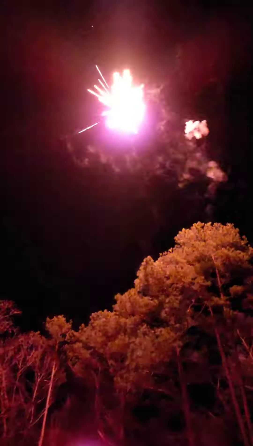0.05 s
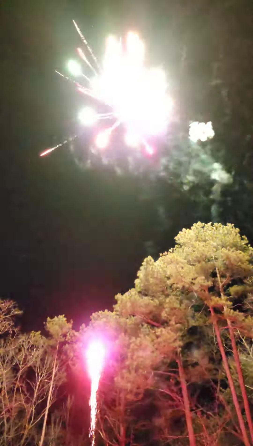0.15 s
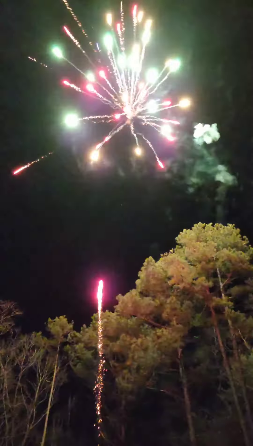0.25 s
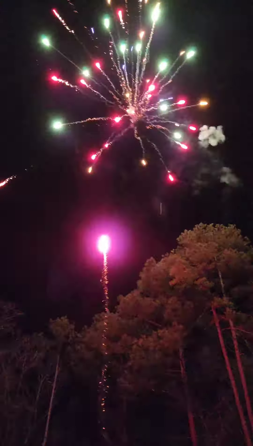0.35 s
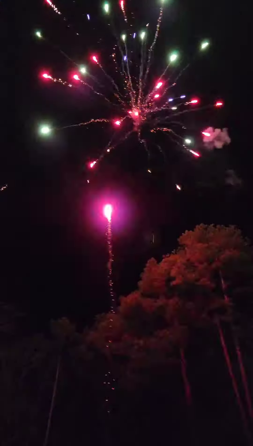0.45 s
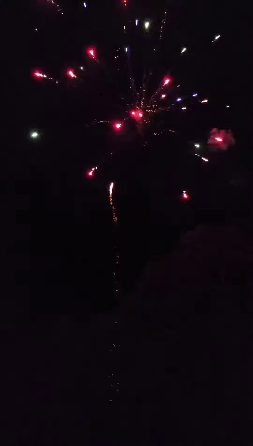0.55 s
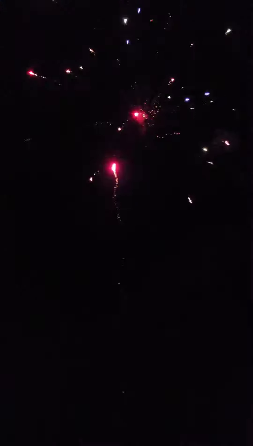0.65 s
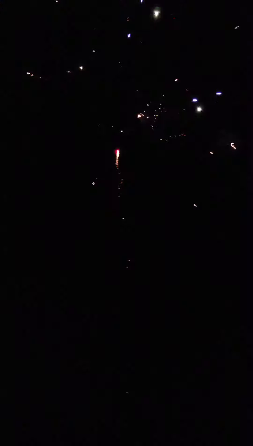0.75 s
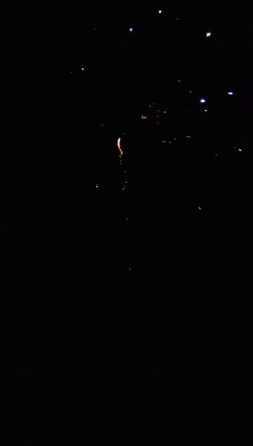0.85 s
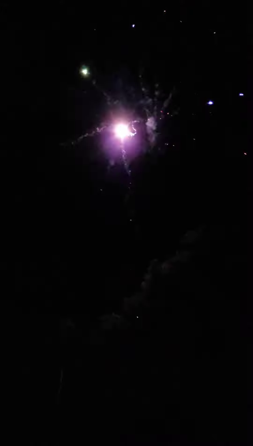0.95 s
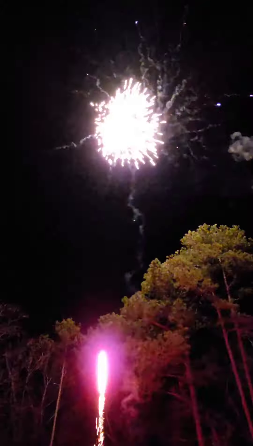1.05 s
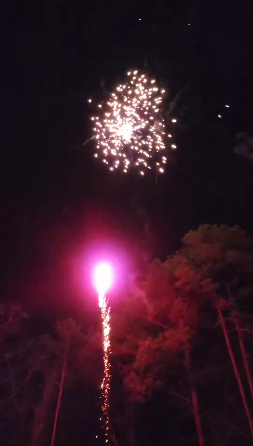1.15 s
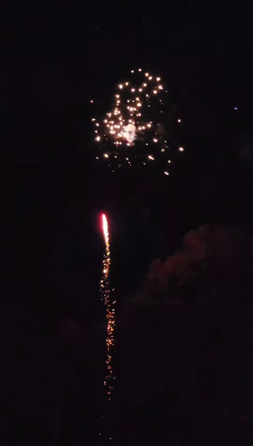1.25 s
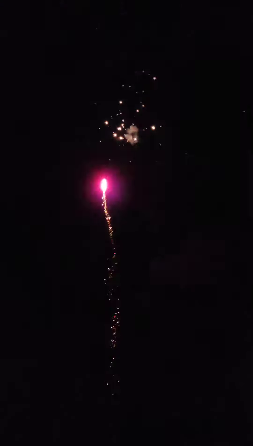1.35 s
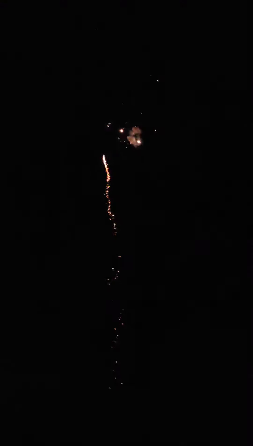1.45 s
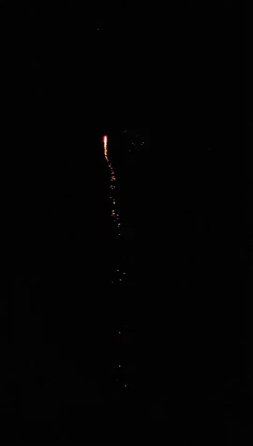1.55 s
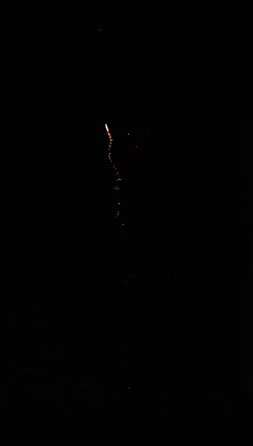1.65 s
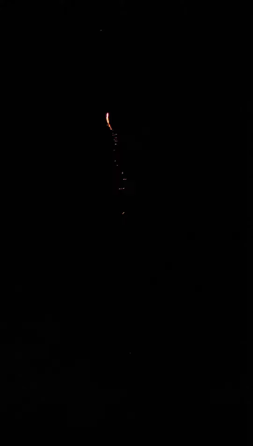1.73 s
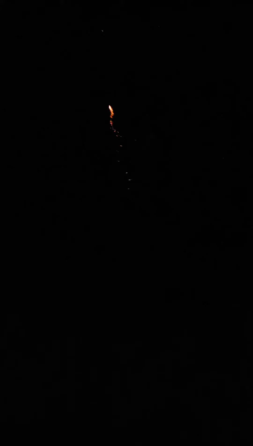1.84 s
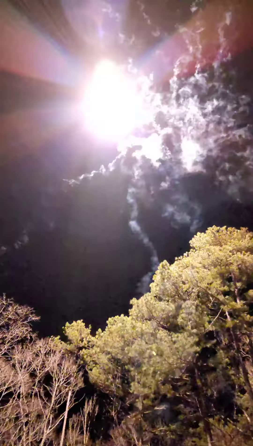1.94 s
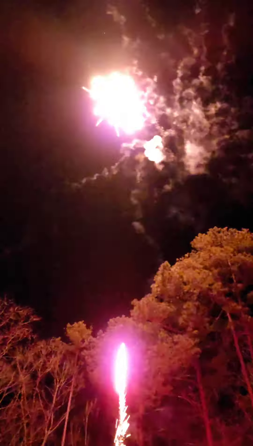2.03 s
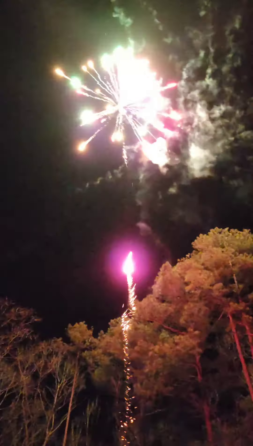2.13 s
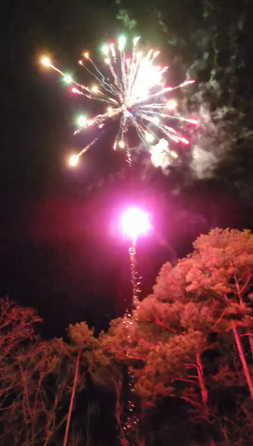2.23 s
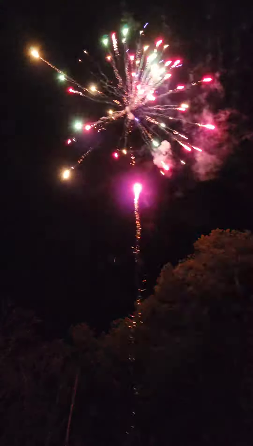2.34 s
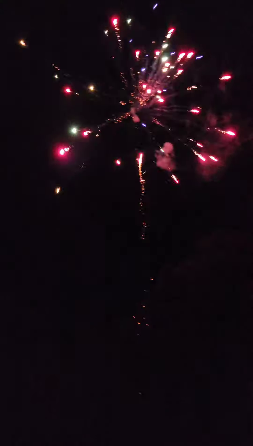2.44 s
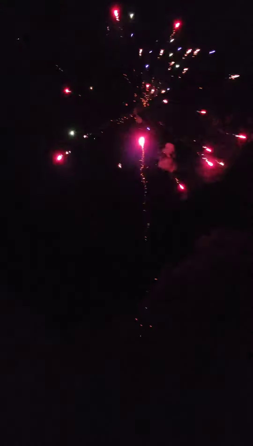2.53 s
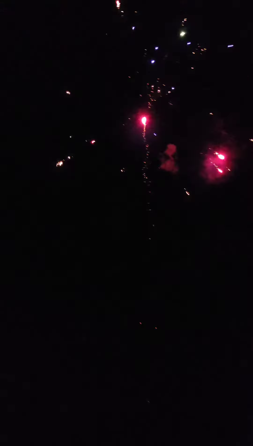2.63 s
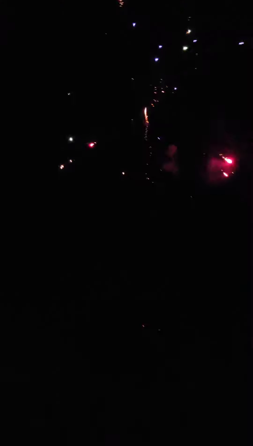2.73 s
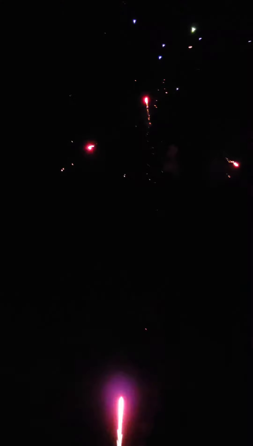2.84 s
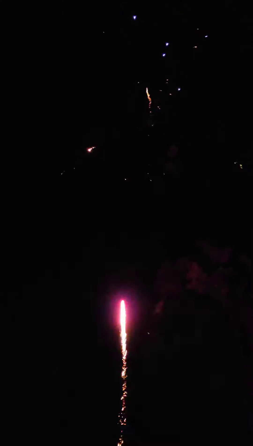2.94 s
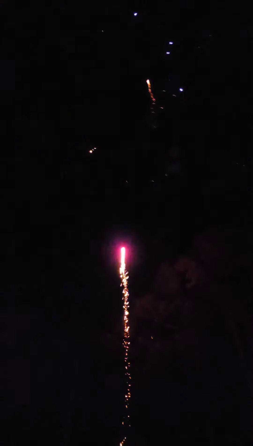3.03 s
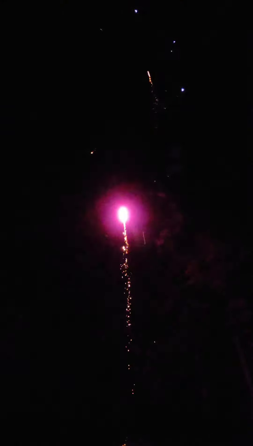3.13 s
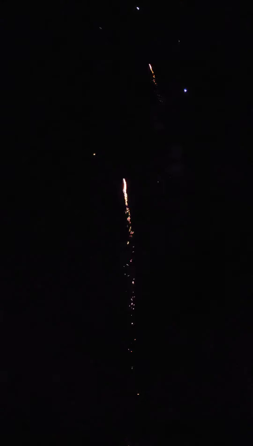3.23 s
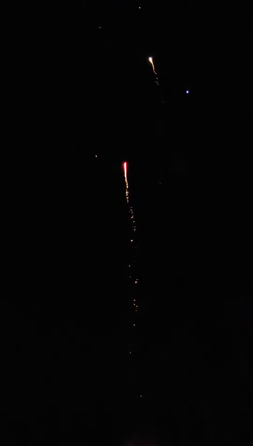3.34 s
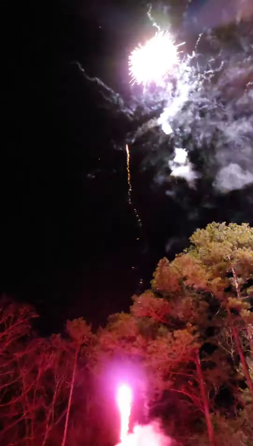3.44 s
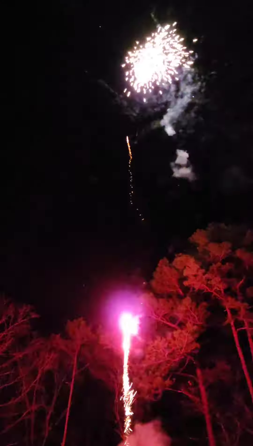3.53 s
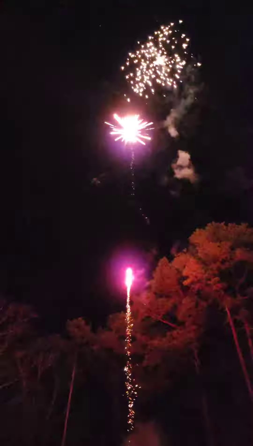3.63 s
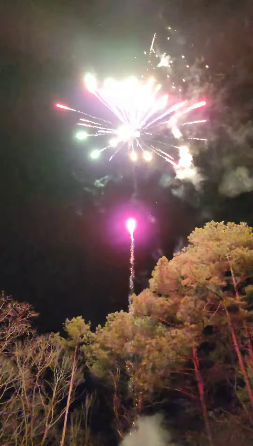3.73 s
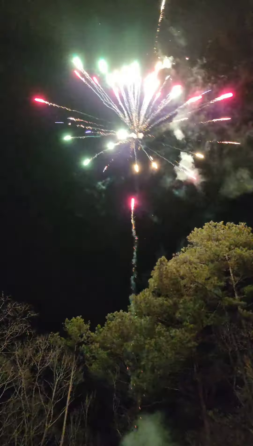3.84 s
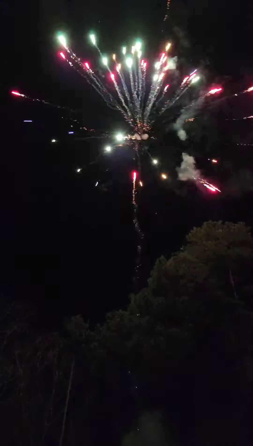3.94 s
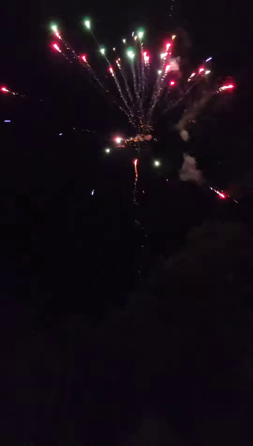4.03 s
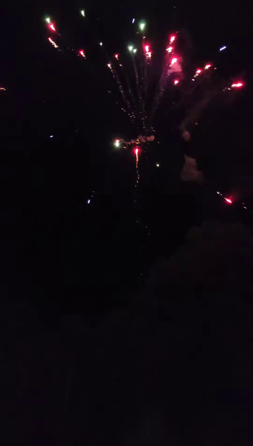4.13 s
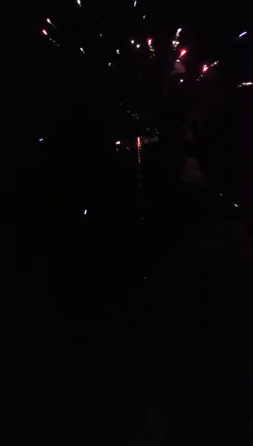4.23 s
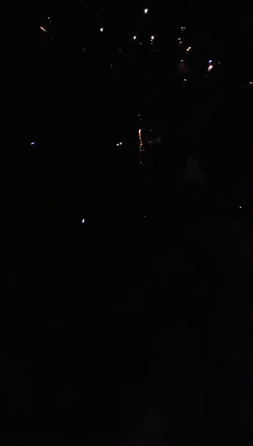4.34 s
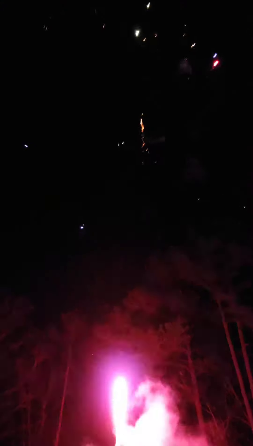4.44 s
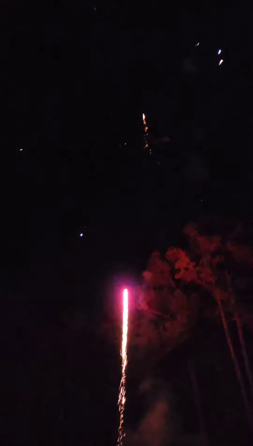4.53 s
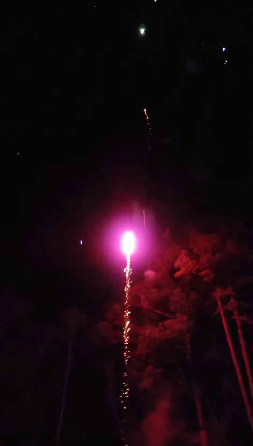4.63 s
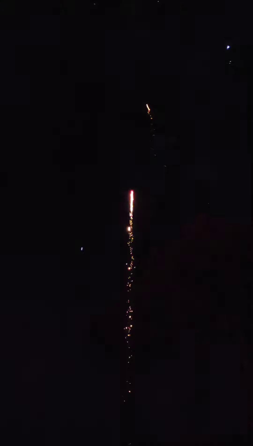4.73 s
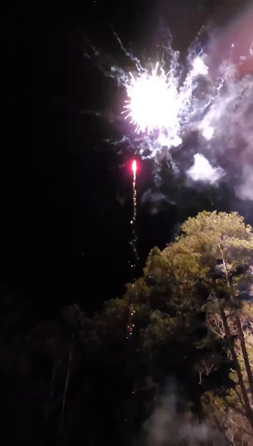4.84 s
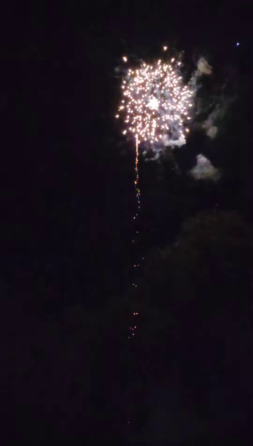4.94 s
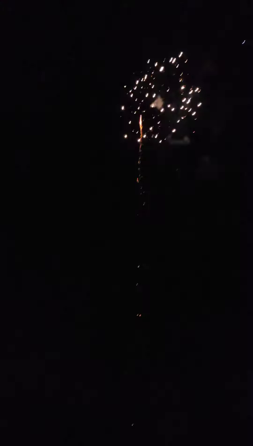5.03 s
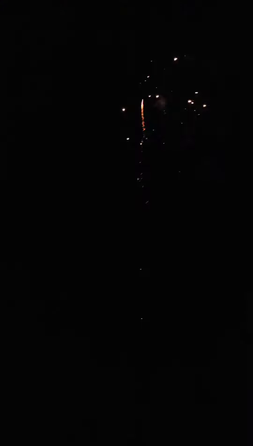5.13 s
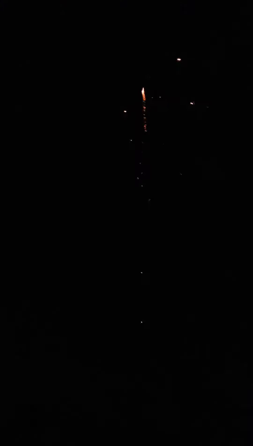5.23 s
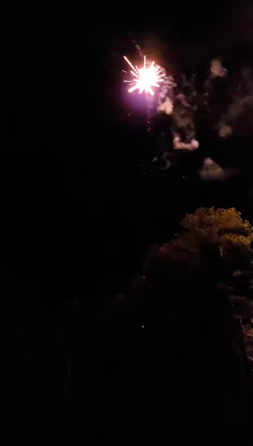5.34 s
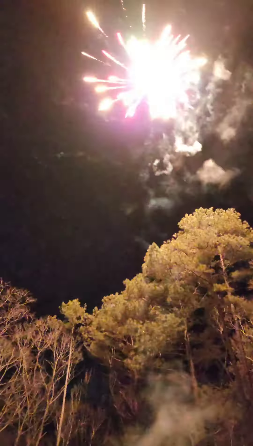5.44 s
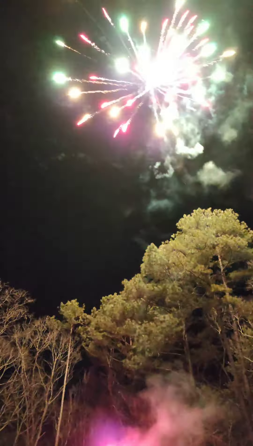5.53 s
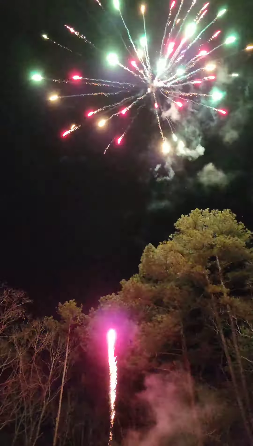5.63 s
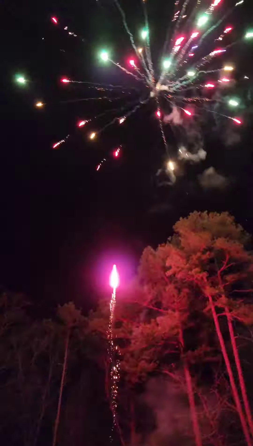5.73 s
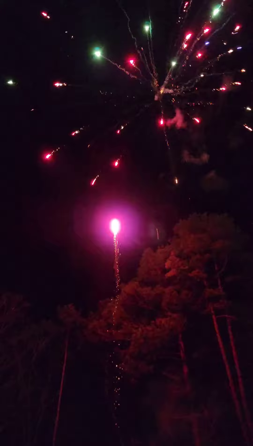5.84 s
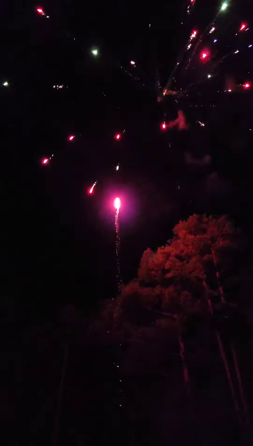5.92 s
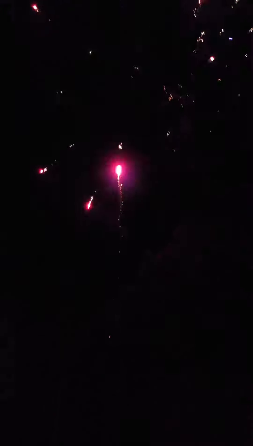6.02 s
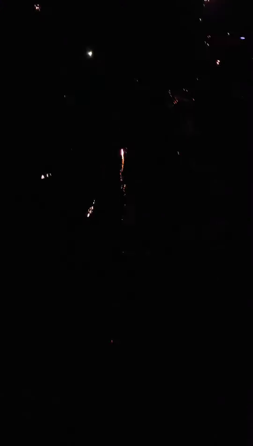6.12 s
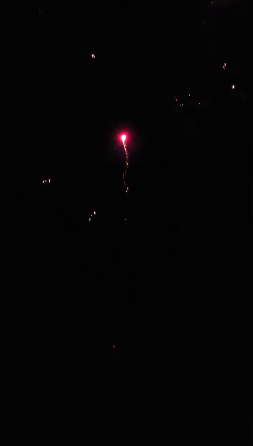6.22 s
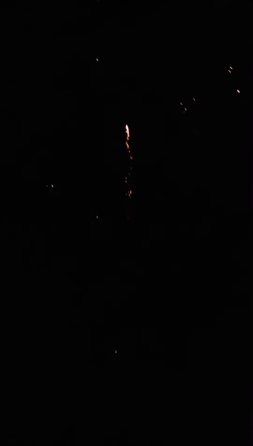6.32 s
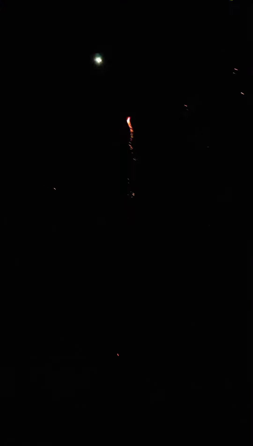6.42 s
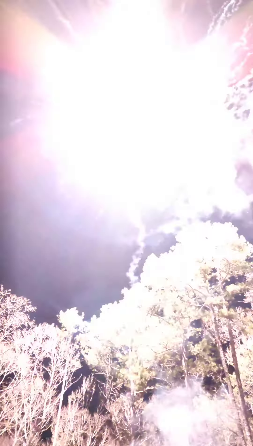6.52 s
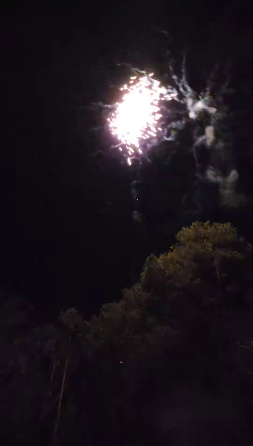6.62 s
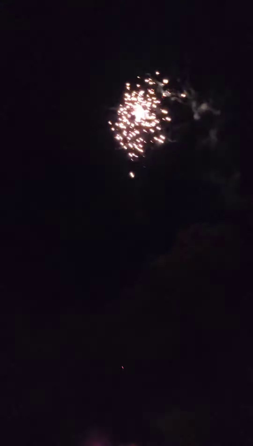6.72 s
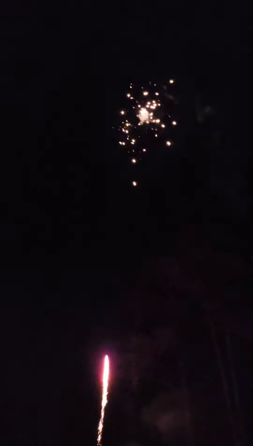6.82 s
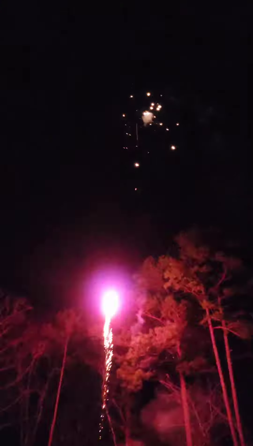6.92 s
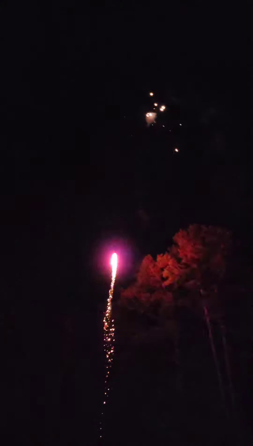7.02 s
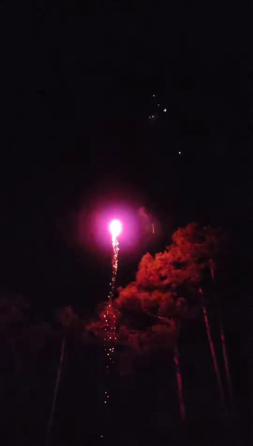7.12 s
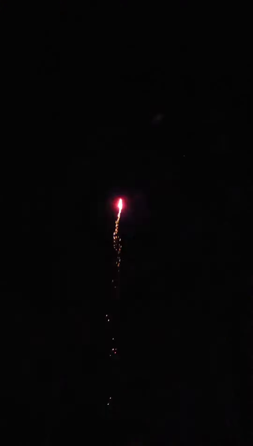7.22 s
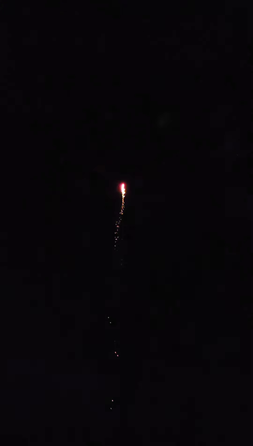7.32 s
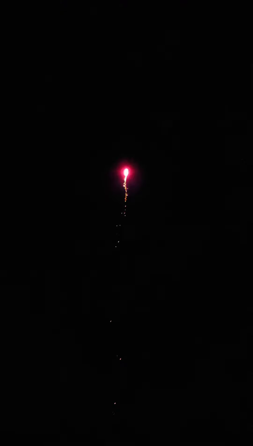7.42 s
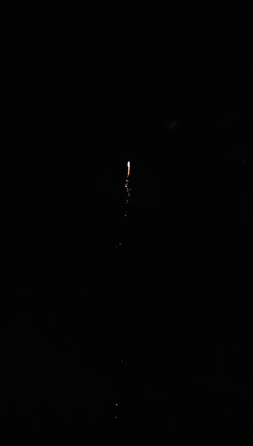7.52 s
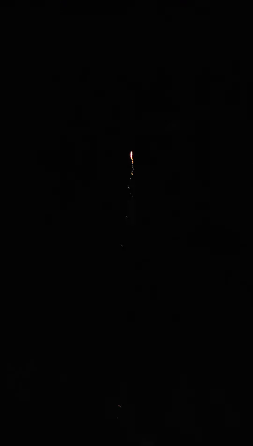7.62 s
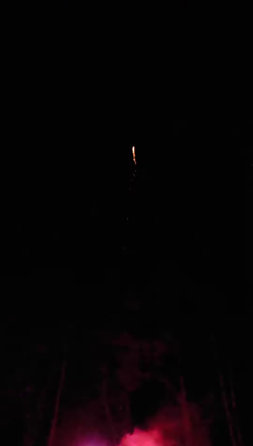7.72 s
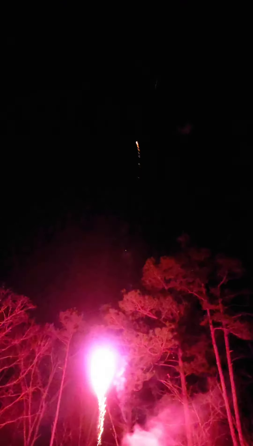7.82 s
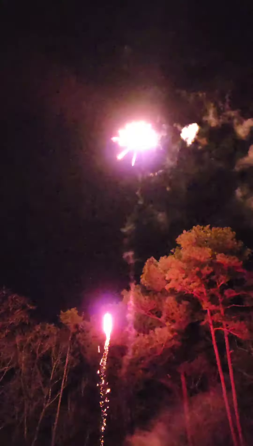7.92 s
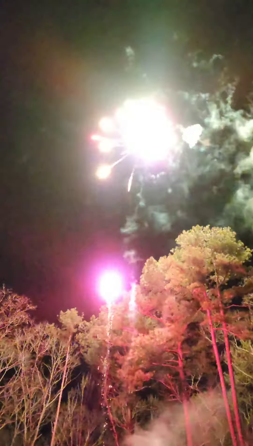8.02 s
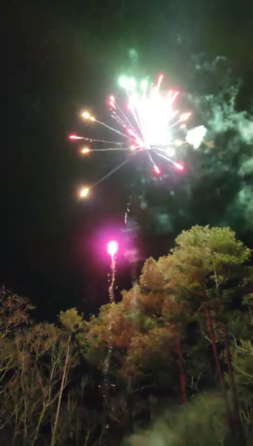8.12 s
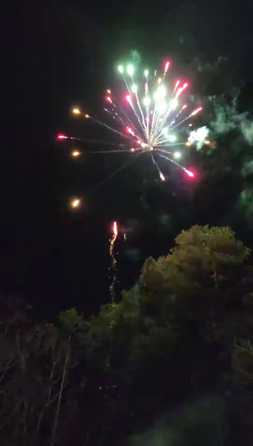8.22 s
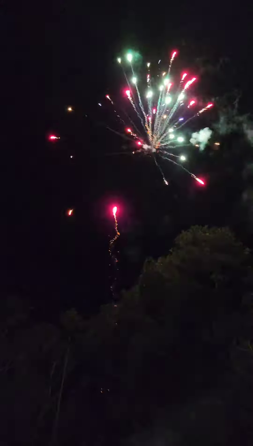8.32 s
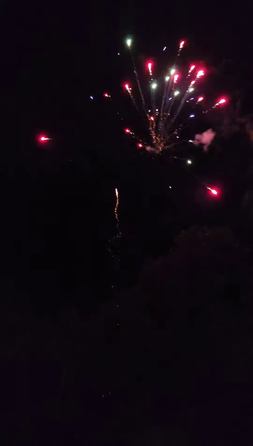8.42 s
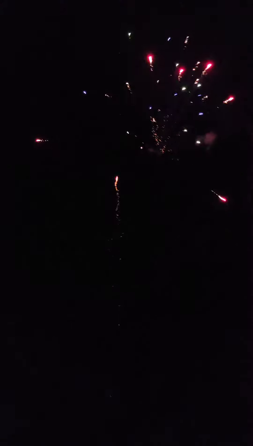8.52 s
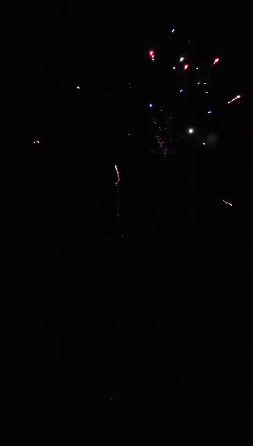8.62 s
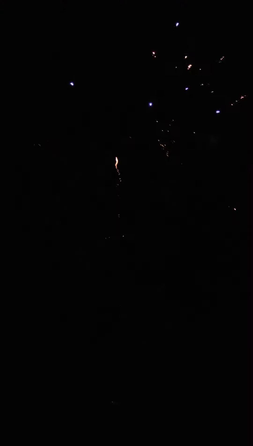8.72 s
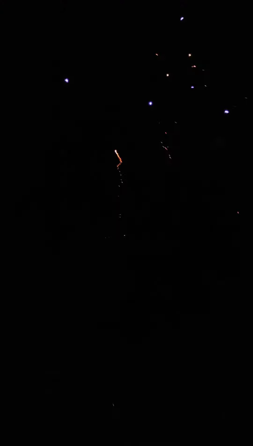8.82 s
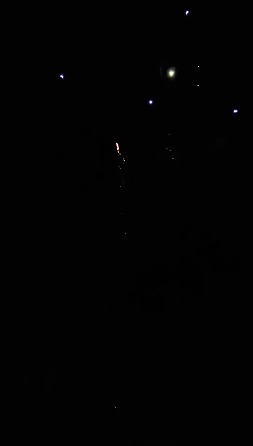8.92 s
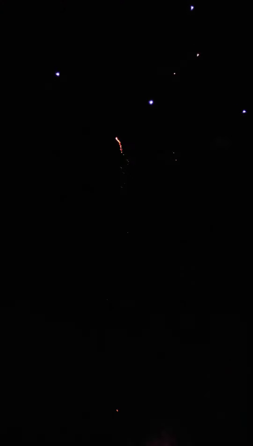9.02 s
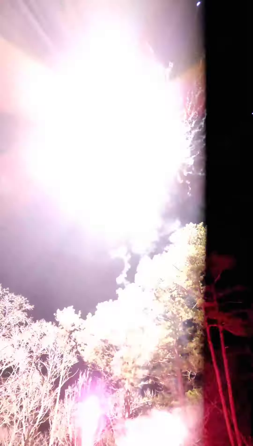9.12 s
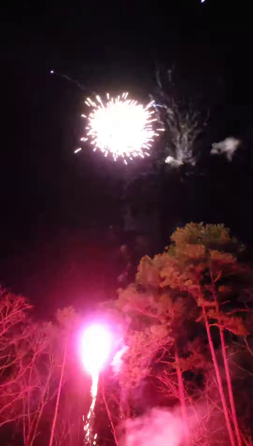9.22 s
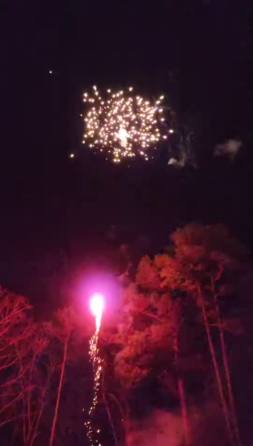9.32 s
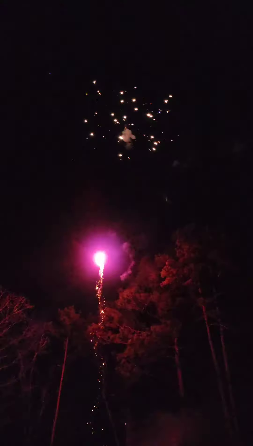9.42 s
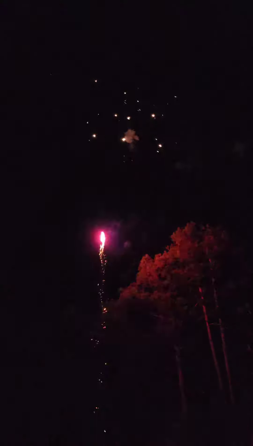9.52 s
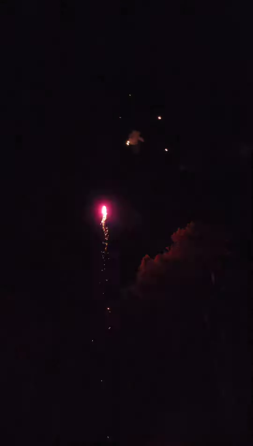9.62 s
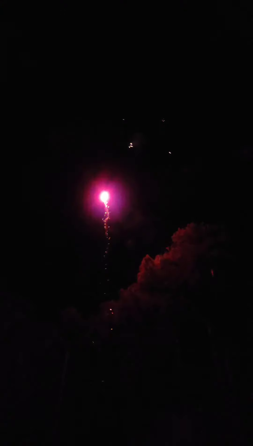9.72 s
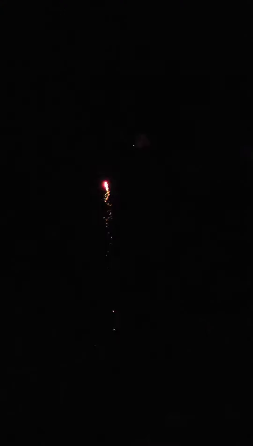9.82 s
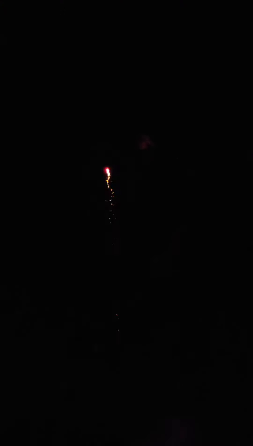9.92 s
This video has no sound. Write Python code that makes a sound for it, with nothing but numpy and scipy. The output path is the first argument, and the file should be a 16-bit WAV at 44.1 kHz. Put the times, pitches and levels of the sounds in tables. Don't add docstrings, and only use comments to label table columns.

```python
import sys
import numpy as np
from scipy import signal
from scipy.io import wavfile
from scipy.ndimage import uniform_filter1d

SR = 44100
rng = np.random.default_rng(int(sys.argv[2]) if len(sys.argv) > 2 else 0)


def how_loud(loudness_db):
    steps = np.asarray(loudness_db, float) / 20
    return 10 ** steps


def persist_wave(psi):
    counts = np.round(np.clip(psi, -1, 1) * 32767).astype(np.int16)
    wavfile.write(sys.argv[1], SR, np.atleast_2d(counts).T)


N = 439236
HOP, FRAME = 128, 512

# (time [s], roll level [dB], push length [ms], ground echo delay [ms], trunk echo level [dB])
BURSTS = [
    (0.0493, -22.5, 0.47, 10.9, 0),
    (1.0509, -19.5, 0.65, 10.9, -4.5),
    (2.0324, -24, 0.51, 10.9, -4.5),
    (3.523, -20, 0.58, 10.7, -6),
    (3.6684, -23, 0.53, 10.3, -5),
    (4.9080, -19.5, 0.6, 10.7, -8.5),
    (5.3977, -22.5, 0.47, 11.0, -3),
    (6.5887, -19, 0.53, 11, -52),
    (7.9756, -23, 0.44, 10.8, -0.5),
    (9.2420, -18.5, 0.62, 9.9, -9),
]
# (time [s], roll level [dB], push length [ms], wall echo level [dB], thud level [dB])
LIFTS = [
    (-.06, -28, 0.84, -10, -12),
    (0.894, -24.5, 0.95, -21, -9.5),
    (1.8530, -29, 1, -19, -9),
    (2.6678, -30, 0.9, -17, -8),
    (3.2917, -25.5, 1, -22.5, -12),
    (4.2824, -27, 0.79, -15, -13),
    (5.456, -32.5, 0.65, -15, -15),
    (7.6139, -27, 0.55, -13, -16),
    (8.9617, -26.5, 0.55, -12, -14.5),
    (9.9179, -24.5, 0.6, -9, -14),
]


def evened(x):
    return x / np.sqrt(np.mean(abs(x) ** 2) + 1e-20)


def read(points, hz):
    f, value = np.transpose(points)
    return np.interp(np.log(hz + 1), np.log(f + 1), value)


def add(mix, s, sound):
    if s > 0:
        part = mix[:, round(s * SR):][:, :sound.shape[1]]
        part += sound[:, :part.shape[1]]


def night_air(lumpy_db=2.5):
    # (frequency [Hz], level [dB])
    air_colour = [(25, -23), (50, -22.5), (90, -9.5), (200, -29), (800, -17.5), (3000, -52.5),
                  (6000, -63.5), (16000, -68.5)]
    hz, t, z = signal.stft(rng.standard_normal((2, N)), SR, nperseg=2048)
    z[1] = 1.2 * z[0] + .5 * z[1]
    lumps = evened(uniform_filter1d(rng.standard_normal(len(t)), 4)) * (hz < 150)[:, None]
    gain = how_loud(read(air_colour, hz)[:, None] + lumpy_db * lumps)
    air = signal.istft(z * gain, SR, nperseg=2048)[1][:, :N]
    return how_loud(-48.5) * evened(air)


def scraps():
    # (time [s], peak level [dB], left minus right [dB])
    landings = [
        (2.6224, -43, -4),
        (6.379, -46.5, 3.5),
        (7.2674, -59, -1),
    ]
    out = np.zeros((2, N))
    t = np.arange(200) / SR
    for s, db, pan_db in landings:
        tick = np.diff(rng.standard_normal(201)) * np.exp(-t / .0008)
        add(out, s, how_loud(db - 1.5) * how_loud(np.array([[pan_db / 2], [-pan_db / 2]])) * tick)
    return out


def waking(age, wake_s, rise_s, first_db, first_s, swell_db_per_s):
    since = np.maximum(age - wake_s, 0)
    onset = 0.077 + 1 - np.exp(-(since / rise_s) ** 2)
    first_trees_db = first_db * (np.exp(-since / first_s) - 0.8366)
    return onset * how_loud(first_trees_db + swell_db_per_s * np.minimum(age, .9))


def stereo_field(left, other):
    # (frequency [Hz], coherence [0 to 1])
    likeness = [(60, 0.95), (130, 0.9), (290, 0.99), (640, 0.56), (1410, 0.077), (3100, -0.15),
                (6200, 0.31), (7400, 0.85)]
    # (frequency [Hz], left minus right [dB])
    balance = [(60, -0.5), (130, -2), (290, 0), (640, -0.5), (1410, -5.5), (3100, 2.5), (6820, -1),
               (15000, 2)]
    # (frequency [Hz], lead of the left [rad])
    phase = [(0, 4.5), (780, -1.15), (1640, 4.5), (3270, 9.5), (5340, 22.5), (6550, 24.5), (7000, 14),
             (16600, 21.5)]
    hz = np.fft.rfftfreq(FRAME, 1 / SR)[:, None]
    same = np.clip(read(likeness, hz), 0, 1)
    right = (same * left + np.sqrt(1 - same ** 2) * other) * np.exp(-1j * read(phase, hz))
    half_lean = how_loud(read(balance, hz) / 2)
    return np.array([left * half_lean, right / half_lean])


def woods(echoes_per_s=6000, spread_db=3.0, patchy_db=2.2):
    # (frequency [Hz], level [dB per Hz])
    burst_colour = [(24, -46), (40, -20), (316, -5), (406, -8), (656, -9), (1060, -13.5), (1840, -14.5),
                    (2620, -23), (3370, -21.5), (11900, -27), (15300, -23), (16500, -69)]
    # (frequency [Hz], level [dB per Hz])
    lift_colour = [(24, -58), (40, -24), (102, -9), (258, -6.5), (427, -10.5), (802, -11.5), (1290, -20),
                   (1580, -11), (2140, -21), (4230, -21), (8000, -25.5), (14900, -32), (16500, -66.5)]
    # (frequency [Hz], reverberation time [s])
    near_t60 = [(60, 0.53), (160, 0.89), (420, 1), (1100, 1), (2900, 0.74), (7700, 0.52), (15000, 0.3)]
    # (frequency [Hz], level [dB])
    deep_colour = [(60, -1.5), (200, -8.5), (850, -8.5), (1050, -9.5), (2000, -8.5), (2250, -11),
                   (5000, -12), (12000, -32)]
    # (frequency [Hz], reverberation time [s])
    deep_t60 = [(60, 3.2), (200, 2.35), (500, 2.99), (1200, 2.49), (2500, 2.03), (5000, 1.1), (12000, 1.17)]
    # (wake [s], rise [s], first trees [dB], their fade [s], swell [dB/s])
    burst_roll, lift_roll = (.011, 0.0078, 2.4, 0.12, 8.73), (0.019, 0.0051, 3.6, 0.017, 7.4)
    # (bass at a roll of -22 dB [dB], bass per roll [dB/dB])
    burst_bass, lift_bass = (0.5, 1.03), (-1.5, .05)

    clicks = rng.choice([-1., 1.], (2, N)) * (rng.random((2, N)) < echoes_per_s / SR)
    clicks *= how_loud(spread_db * np.minimum(rng.exponential(1, (2, N)), 4))
    hz, t, z = signal.stft(clicks, SR, nperseg=FRAME, noverlap=FRAME - HOP)
    power = np.zeros(z.shape[1:])
    bass = np.clip(np.log2(900 / (hz + 1)), 0, 1)
    for blasts, roll, colour, (bass_db, deeper) in ((BURSTS, burst_roll, burst_colour, burst_bass),
                                                    (LIFTS, lift_roll, lift_colour, lift_bass)):
        shape = evened(how_loud(read(colour, hz)))
        for s, db, *_ in blasts:
            after = (t > s) & (t < s + 2.5)
            age = t[after] - s
            near = how_loud(-60 * age / read(near_t60, hz)[:, None])
            deep = how_loud(read(deep_colour, hz)[:, None] - 60 * age / read(deep_t60, hz)[:, None])
            spectrum = shape * how_loud(db + (bass_db + deeper * (db + 22)) * bass)
            level = spectrum[:, None] * waking(age, *roll)
            power[:, after] += level ** 2 * (near ** 2 + deep ** 2)
    patches = uniform_filter1d(rng.standard_normal(power.shape), 6, 0)
    patches = evened(uniform_filter1d(patches, 12, 1))
    z = stereo_field(*(z / clicks.std())) * np.sqrt(power) * how_loud(patchy_db * patches)
    return signal.istft(z, SR, nperseg=FRAME, noverlap=FRAME - HOP)[1][:, :N]


def shock(push_ms, lag_ms, overload, cross, rough, own=1):
    ms = np.arange(700) * 1000 / SR - 1
    u = np.maximum(ms - np.array([[lag_ms], [0]]), 0) / push_ms
    grit = np.array([[.9, .3], [.9, -0.62]]) @ rng.standard_normal(u.shape)
    grit = rough * grit * np.exp(-u / 1.6)
    ports = overload * ((1 - u) * np.exp(-u) + grit) * (u > 0)
    return np.tanh(np.array([[1], [own]]) * ports - np.array(cross)[:, None] * ports[::-1])


def ring(db):
    t = np.arange(400) / SR
    wander = uniform_filter1d(rng.standard_normal(400), 30)
    turns = np.cumsum(4164 * (1 + .6 * wander)) / SR
    return how_loud(db) * np.array([[.12], [1]]) * np.sin(2 * np.pi * turns) * np.exp(-t / .0008)


def thud(db, swing_ms=2.27):
    u = np.arange(-700, 700) * 1000 / SR / swing_ms
    return how_loud(db) * np.array([[.9], [1]]) * (1.08 * u ** 2 - 1) * np.exp(-u ** 2 / 1.85)


def lifts():
    out = np.zeros((2, N))
    for s, _, push_ms, wall_db, thud_db in LIFTS:
        s -= .0013
        add(out, s, how_loud(4.5) * shock(push_ms, .3, 2.6, (.04, .9), 0.065, own=0.72))
        add(out, s + 0.001018, ring(-5.0 - 0.51 * (thud_db + 13.5)))
        add(out, s + 0.0022 - 700 / SR, thud(thud_db))
        add(out, s + .0024, how_loud(0.5) * shock(2.45 * push_ms, 0.23, 0.48, (.05, .05), 0.06))
        add(out, s + .0298, how_loud(wall_db) * shock(push_ms, 0.11, 2.4, (.1, .2), 0.19))
        add(out, s + .0935, how_loud(wall_db - 10) * shock(push_ms, .1, 1.7, (.1, .2), .1))
    return out


def bursts():
    # (delay [ms], level [dB], left port lag [ms], push length factor)
    trunks = [
        (2.5, 0.5, .1, 0.4),
        (3.599, 0, -0.017, 0.76),
    ]
    out = np.zeros((2, N))
    for s, _, push_ms, ground_ms, trunk_db in BURSTS:
        s -= .001
        bounce = s + ground_ms / 1000
        add(out, s, how_loud(4.25) * shock(push_ms, -0.1, 3.46, (.12, .05), 0.09))
        add(out, bounce - .0004, how_loud(5.0) * shock(1.09 * push_ms, 0.49, 1.65, (.05, .3), 0.08))
        for ms, db, lag_ms, size in trunks:
            direct = shock(size * push_ms, lag_ms, 2.22, (.1, .1), 0.062)
            add(out, s + ms / 1000, how_loud(db + trunk_db) * direct)
            bounced = shock(size * push_ms, lag_ms, 1.42, (.1, .1), 0.074)
            add(out, bounce + ms / 1000, how_loud(db - 8.5) * bounced)
        flash = np.clip(-trunk_db / 14, 0, 1)
        add(out, bounce + .0037, flash * how_loud(-6) * shock(1.1 * push_ms, 0.24, 2.3, (.1, .1), 0.42))
        add(out, bounce + .0046, flash * ring(-6.5))
    return out


def scene():
    return night_air() + scraps() + woods() + lifts() + bursts()


def port_resonances(x):
    hz, width_hz = 4100, 370
    x = x + 0.52 * np.array([[.6], [1.5]]) * signal.lfilter(*signal.iirpeak(hz, hz / width_hz, SR), x)
    hz, width_hz = 7450, 900
    return x + 0.8 * signal.lfilter(*signal.iirpeak(hz, hz / width_hz, SR), x)


def smear_ahead(x, fade_s=.007):
    # (frequency [Hz], level [dB])
    whistles = [(1120, 4), (1820, 7.5), (4300, -5), (7300, -8.5)]
    t = np.arange(-2048, 2049) / SR
    band = signal.butter(1, (900, 9000), "band", fs=SR)
    hiss = signal.lfilter(*band, rng.standard_normal((2, len(t))))
    tones = sum(how_loud(db) * np.sin(2 * np.pi * (hz * t + rng.random((2, 1)))) for hz, db in whistles)
    smear = np.array([[.6], [1.3]]) * (evened(hiss) + tones) * np.exp(t / fade_s) * (t < 0)
    both = x.mean(0, keepdims=True)
    loud = both * (abs(both) > .4)
    return how_loud(-19.5) * signal.oaconvolve(loud, smear / np.sqrt(fade_s * SR), "same", axes=1)


def low_pass(x):
    return signal.sosfilt(signal.butter(12, 17020, fs=SR, output="sos"), x)


def record(dry):
    x = port_resonances(dry)
    low_side = signal.filtfilt(*signal.butter(1, 130, fs=SR), x[0] - x[1]) / 2
    x = x - 0.58 * np.array([low_side, -low_side])
    ceiling = .86
    x = np.clip(signal.lfilter(*signal.butter(1, 70, "high", fs=SR), x), -ceiling, ceiling)
    x = x + smear_ahead(x)
    band_limit = signal.firwin(255, 16000, window=("kaiser", 8), fs=SR)
    x = signal.oaconvolve(x, band_limit[None], "same")
    return low_pass(x)


dry = scene()
out = record(dry)
persist_wave(out)
```